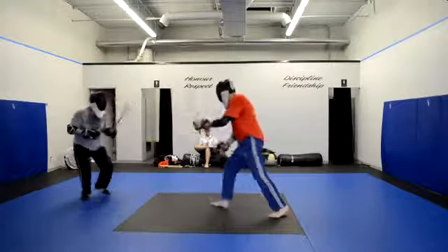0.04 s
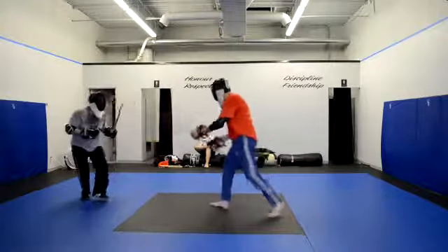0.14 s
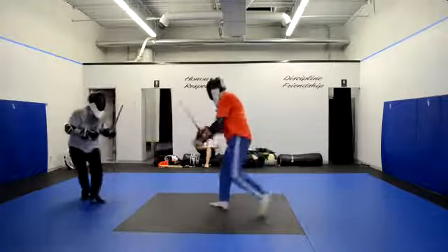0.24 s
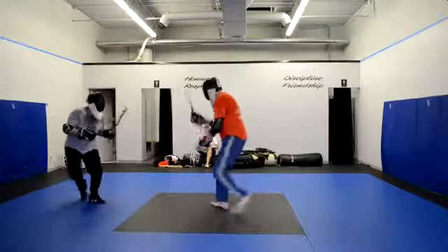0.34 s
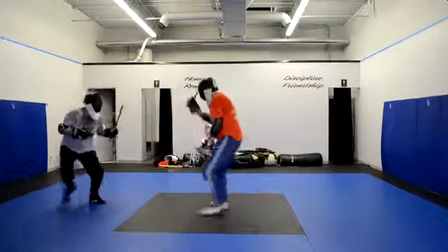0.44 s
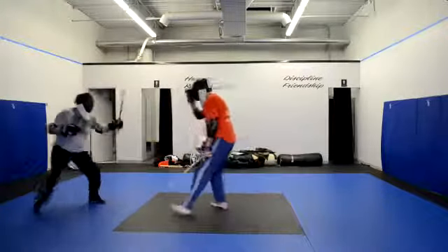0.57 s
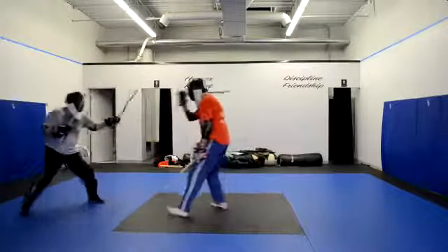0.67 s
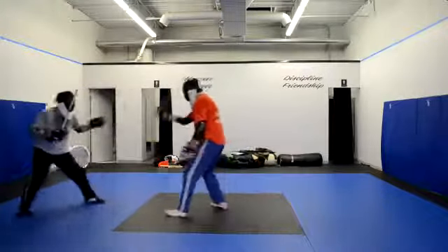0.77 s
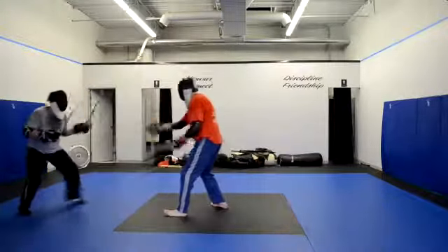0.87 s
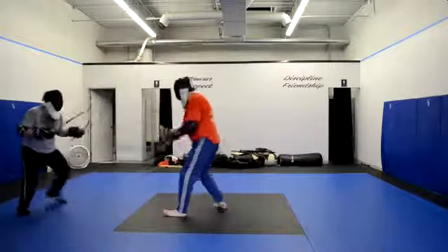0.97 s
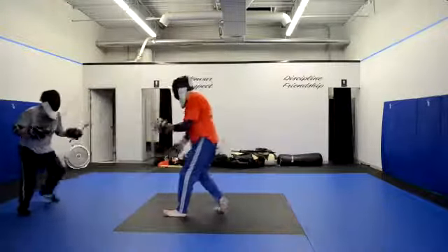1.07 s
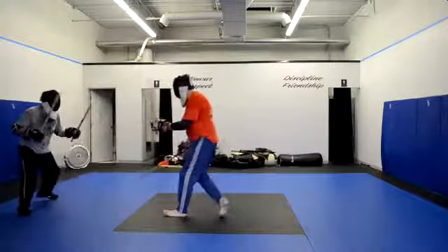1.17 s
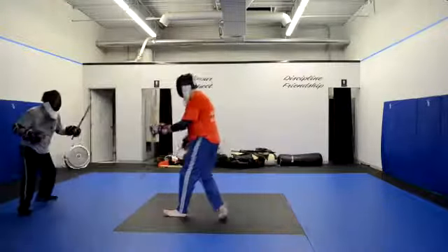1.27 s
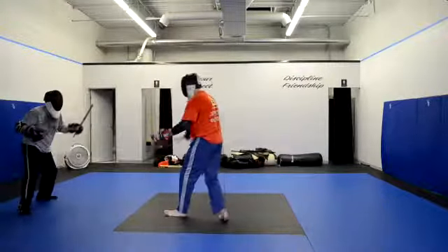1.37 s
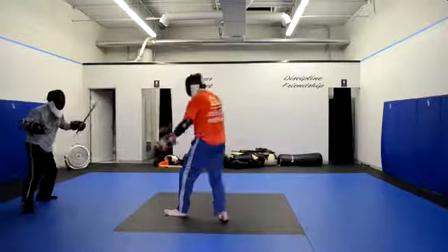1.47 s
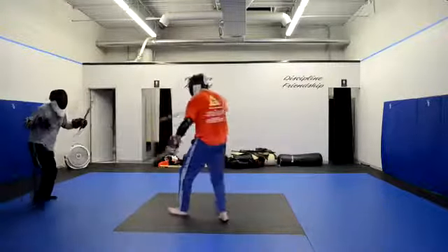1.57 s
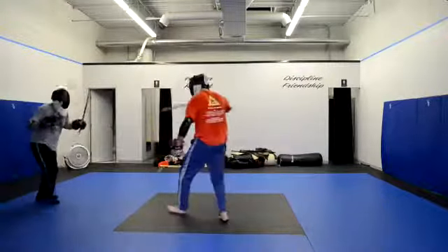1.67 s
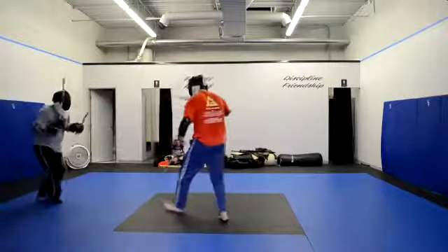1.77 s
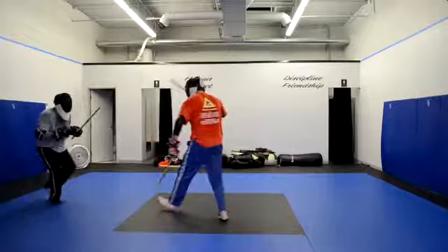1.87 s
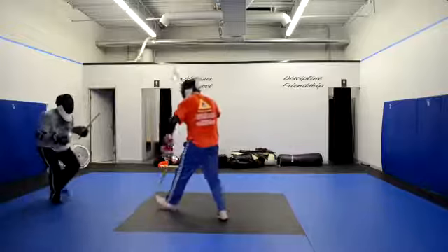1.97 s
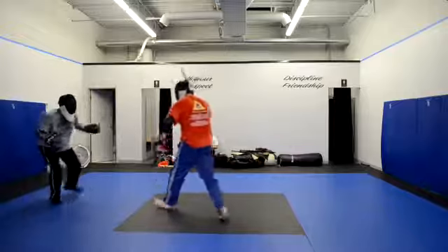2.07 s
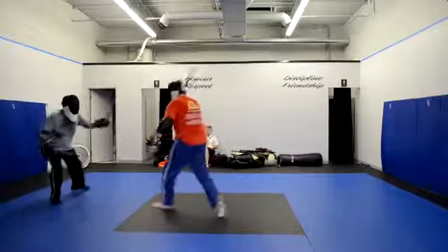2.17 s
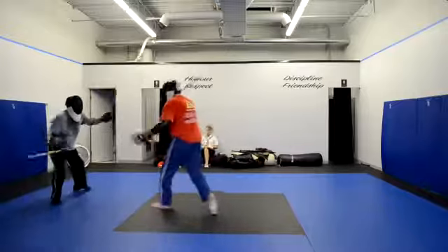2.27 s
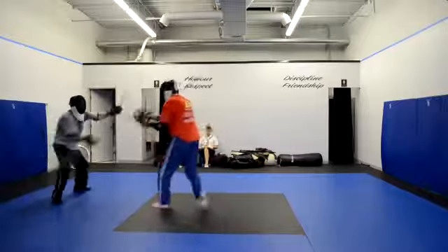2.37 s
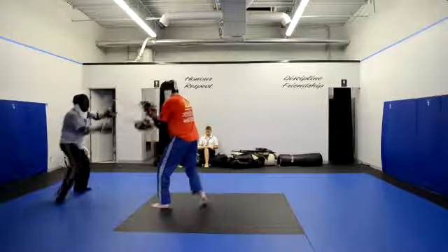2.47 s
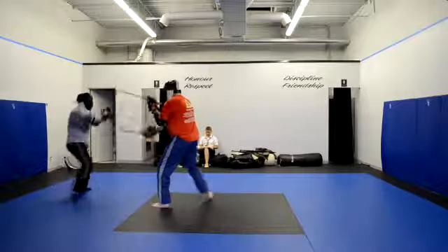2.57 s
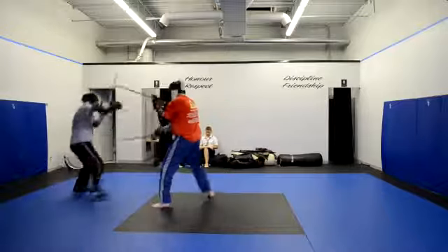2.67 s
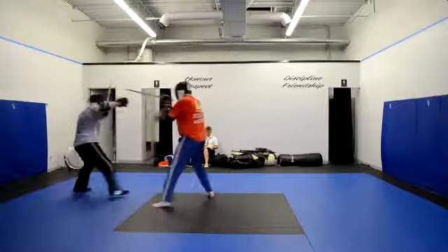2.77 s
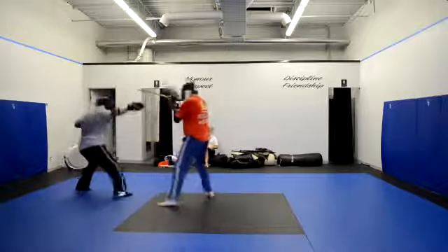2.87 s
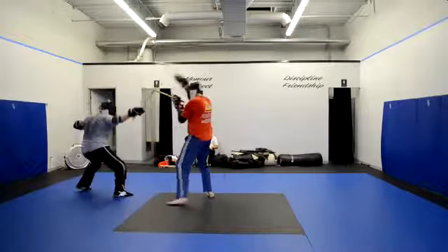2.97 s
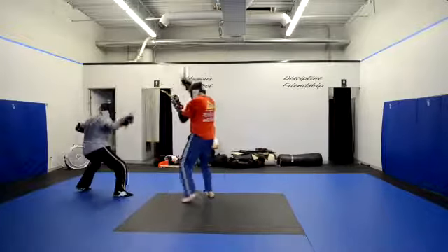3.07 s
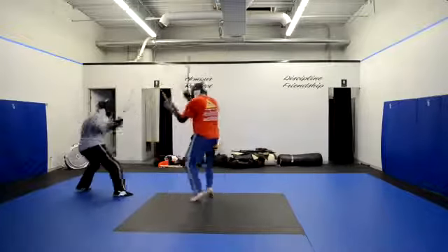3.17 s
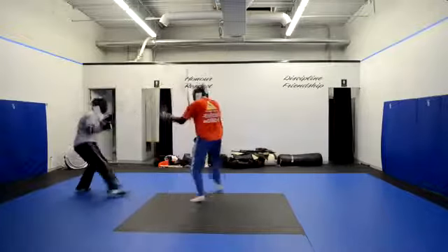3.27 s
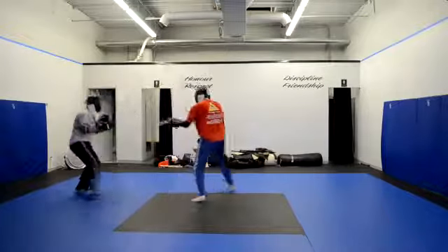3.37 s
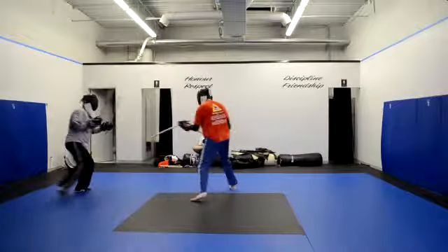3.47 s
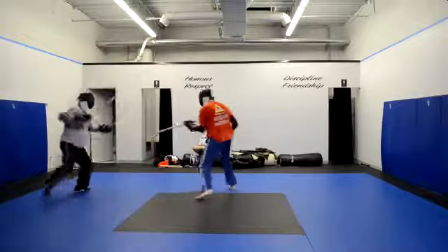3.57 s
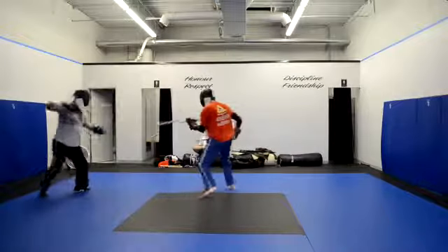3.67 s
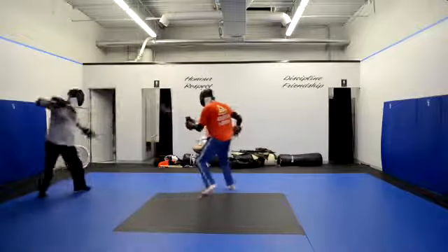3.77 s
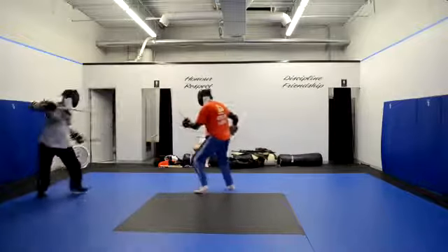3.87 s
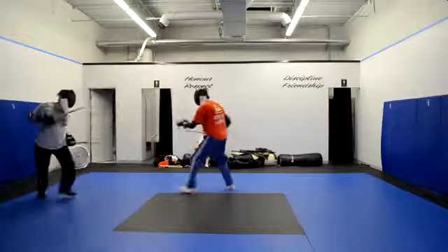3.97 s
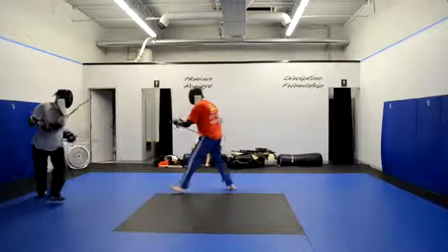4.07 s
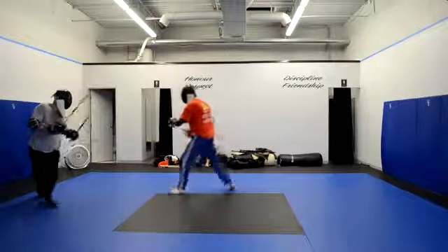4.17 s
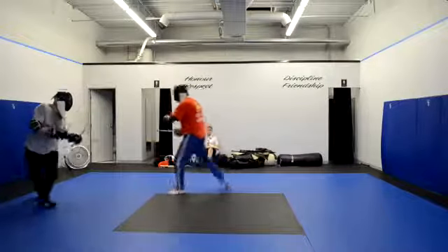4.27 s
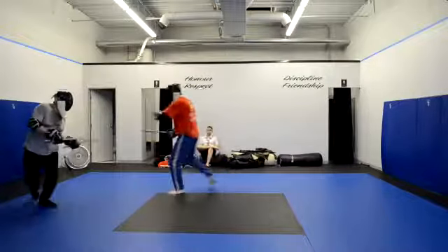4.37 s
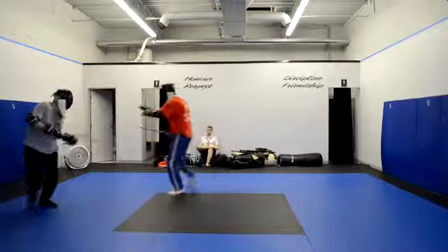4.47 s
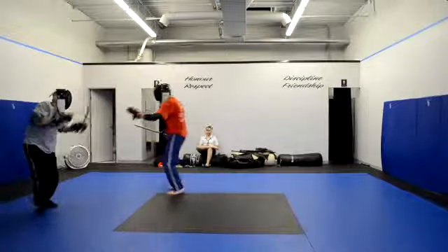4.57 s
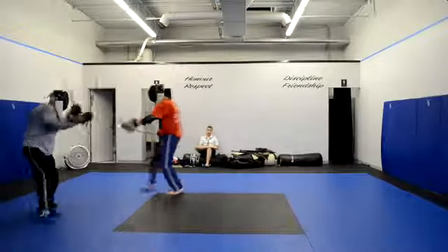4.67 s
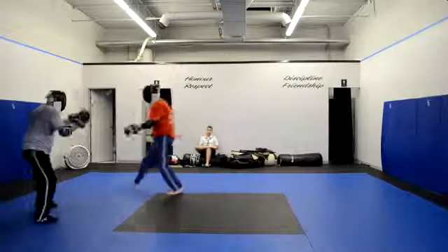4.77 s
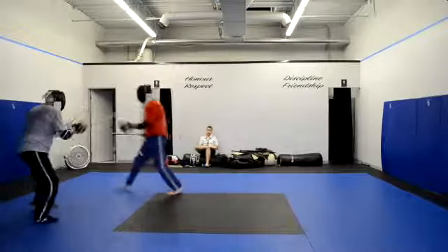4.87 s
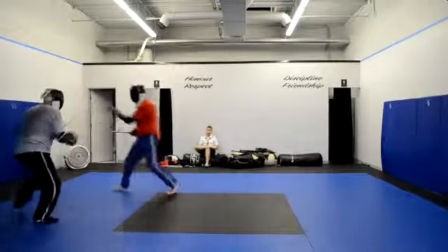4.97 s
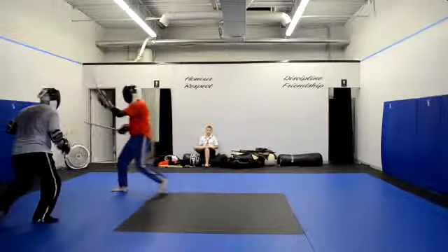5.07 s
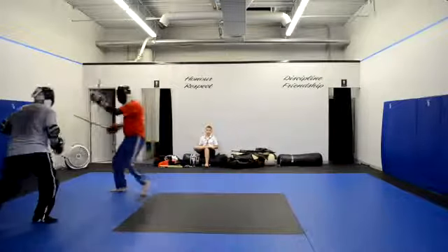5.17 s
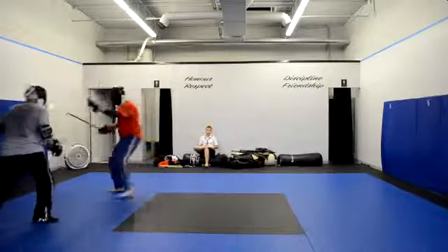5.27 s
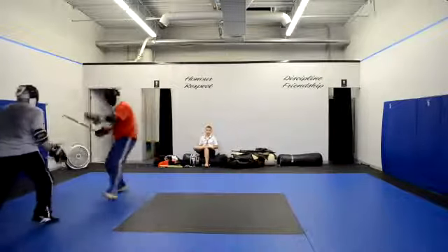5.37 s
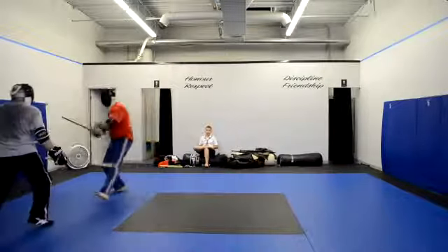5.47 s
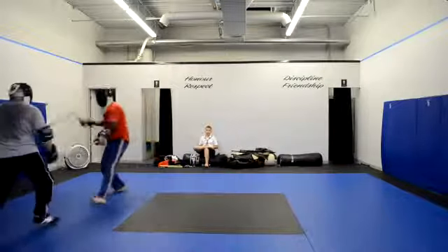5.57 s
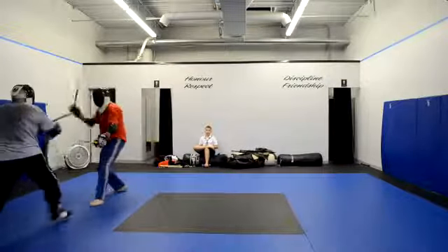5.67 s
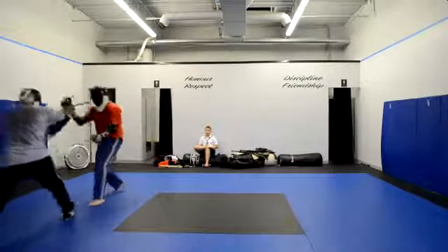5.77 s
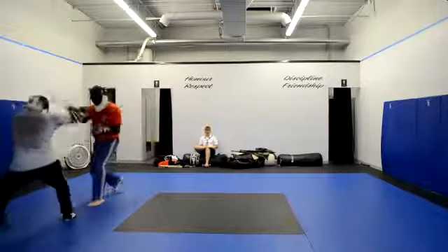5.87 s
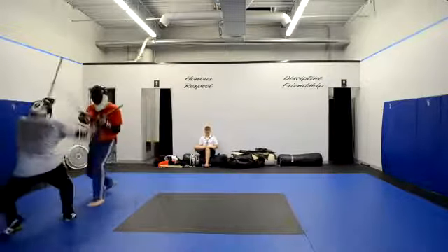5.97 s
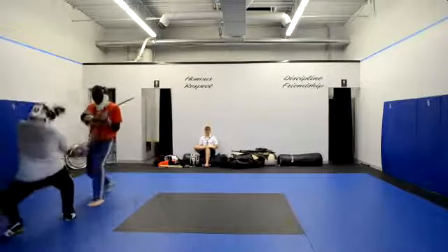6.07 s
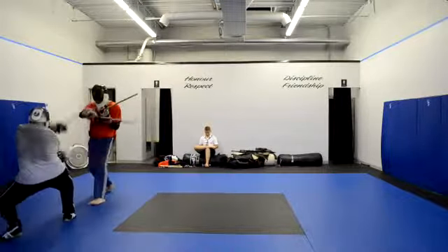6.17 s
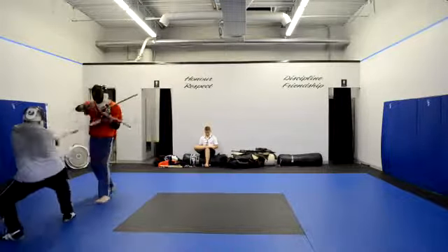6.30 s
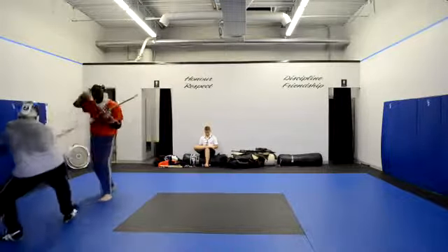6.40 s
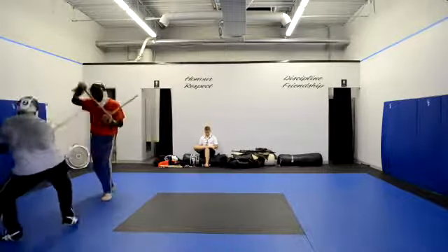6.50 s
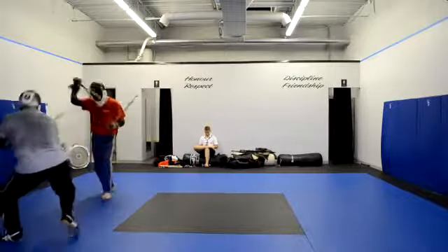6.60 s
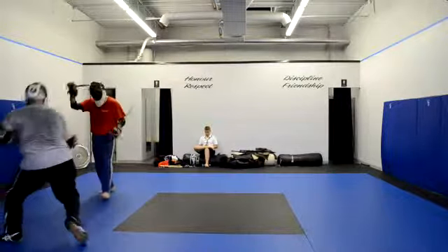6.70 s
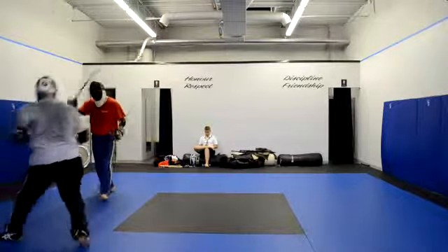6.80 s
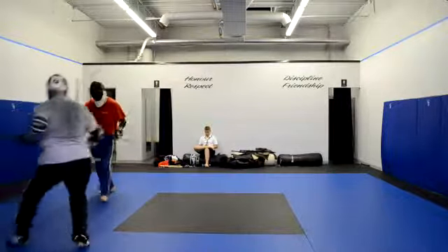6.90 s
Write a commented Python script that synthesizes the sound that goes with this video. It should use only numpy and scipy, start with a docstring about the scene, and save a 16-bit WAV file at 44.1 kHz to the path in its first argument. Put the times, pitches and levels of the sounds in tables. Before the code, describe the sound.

Over a quiet rush of ventilation, hard wooden sticks clack singly at irregular intervals: a light start, a cluster of three loud cracks near the middle, then four later hits, the last deeper and woodier. Every strike is dry and snappy with a brief rattle, then a diffuse hard-walled room tail. Muffled feet land on mats and gear rubs faintly. Mono room microphone, its echoes briefly squashed after the loudest cracks.

```python
"""Stick sparring in an echoing gym

Two people spar with wooden sticks on mats in a bare gym.
Each clack mixes a sharp crack, a short ring of stick modes, a bounce and a second of reverberation.
Feet thud as shaped clicks; gear, clothes and ventilation are filtered noise.
The hardest blows overload the recorder: it clips the first crack and ducks the echo.
"""
import sys
import numpy as np
from scipy import signal
from scipy.fft import rfft, irfft
from scipy.io import wavfile

SR = 44100
rng = np.random.default_rng(int(sys.argv[2]) if len(sys.argv) > 2 else 0)


def file_out(sig):
    """Save sig as 16-bit WAV at sys.argv[1]."""
    # one column per channel
    cols = np.atleast_2d(sig).T
    # limit, then scale
    lim = np.clip(cols, -1, 1)
    pcm = np.round(lim * 32767).astype(np.int16)
    wavfile.write(sys.argv[1], SR, pcm)


N = 306054  # length of the scene in samples
HZ = np.fft.rfftfreq(8192, 1 / SR)  # frequency axis of the short sounds

RING_DB = 9  # ring of a light blow against its crack
FIRM_DB, DAMPING_DB_PER_DB = -9.5, 1.76  # above FIRM_DB the grip damps the ring and the crack takes over
# a harder blow is a shorter contact, so its knock is higher
KNOCK_HZ, KNOCK_DB_PER_OCTAVE = 3480, 26.5  # KNOCK_HZ is the pitch at level 0 dB
# a square hit bites in the upper mids, most of all in the direct sound
BITE_HZ, EDGE_DB_PER_BITE_DB, EDGE_DB = 4240, 1.5, -1
DIRECT_DB = -5  # direct clack against its room sound
CHATTER_DB = -5  # chatter of the shafts against the bounce

# Blows, one a row: [t/s, room level/dB, contact spot/share of stick length, body/dB, crack/dB,
#   main tone f/Hz, main tone level/dB, bite/dB, bounce delay t/s, bounce level/dB]
BLOWS = [ (0.0585, -33.5, 0.13, 4, -4, 1720, 2.5, -5.5, 0.0082, -12),
         (0.3749, -16, .42, -7, -4, 2100, 1, 2, .0088, -2),
         (2.0107, -10.5, 0.052, -8, -4, 2320, 5, 7, 0.0078, 0.5),
         (2.4785, -5, .345, 7.5, 2.5, 1140, 4.5, 1, .0092, -1),
         (2.9518, -1.5, 0.17, -0.5, 3, 1980, 3.5, 6.5, .0020, -12),
         (4.4270, -18.5, 0.18, -3, -2.5, 800, 1.5, 4.5, .0138, -1),
         (4.7470, -3.5, 0.15, -3, -1, 1364, 2.5, 4.5, 0.01, -2.5),
         (5.1570, -12, 0.23, -6.5, -2, 2200, 0, -1.5, .006, -23),
         (5.9620, -6.5, 0.035, 15.5, -4, 685, 7, 4, .0074, -4)]
# Crack of wood on wood, spectrum shape: [f/Hz, relative level/dB]
CRACK_SPECTRUM = [(40, -36), (150, -21), (400, -8.5), (650, -3.5), (1000, 3), (1600, 8), (2400, 6.5),
                  (3500, -2), (5000, -11.5), (7000, -18), (9500, -26.5), (12000, -26.5)]


def sticks(body_hz=480, crack_hz=4500, tone_octaves=0.19, bite_octaves=0.38,
           edge_hz=3200, thin_hz=380, thin_db=-7, near_ring_db=6,
           knock_db=8, knock_octaves=0.19, spread_s=0.001532, spread_hz=1800,
           rebound_s=.0012, rattle_s=0.0026, rattle_db=-1):
    """Blows ring the sticks; where and how hard they meet sets the body, tones and brightness."""
    out = np.zeros(N)
    crack_power = amp(read(CRACK_SPECTRUM, HZ)) ** 2
    # bending waves carry treble faster than bass, which spreads each blow in time
    group_delay = spread_s / (1 + HZ / spread_hz)
    dispersion = np.exp(-2j * np.pi * np.cumsum(group_delay) * HZ[1])
    for s, db, spot, body_db, crack_db, tone_hz, tone_db, bite_db, bounce_s, bounce_db in BLOWS:
        ring_power = ringing(spot)
        ring_db = RING_DB - DAMPING_DB_PER_DB * max(db - FIRM_DB, 0)
        knock_hz = KNOCK_HZ * 2 ** (db / KNOCK_DB_PER_OCTAVE)
        edge_db = EDGE_DB + EDGE_DB_PER_BITE_DB * bite_db
        chatter_db = bounce_db + CHATTER_DB

        colour = body_db * (1 - above(body_hz))
        colour += crack_db * above(crack_hz)
        colour += tone_db * hump(tone_hz, tone_octaves)
        colour += bite_db * hump(BITE_HZ, bite_octaves)

        # the sound sent all round feeds the echo
        room_power = crack_power + amp(ring_db) ** 2 * ring_power
        room_clack = sized(impulse(colour + 10 * np.log10(room_power)), db)
        add(out, s, signal.fftconvolve(room_clack, gym()))

        # straight from the shaft the clack is thinner and more ringing, with a knock at one pitch
        direct_power = crack_power + amp(ring_db + near_ring_db) ** 2 * ring_power
        direct_spectrum_db = colour + 10 * np.log10(direct_power)
        direct_spectrum_db += edge_db * above(edge_hz)
        direct_spectrum_db += thin_db * (1 - above(thin_hz))
        direct_spectrum_db += knock_db * hump(knock_hz, knock_octaves)
        click = impulse(direct_spectrum_db)
        spread_click = irfft(rfft(click, 2 * len(HZ) - 2) * dispersion)
        clack = sized(spread_click, db + DIRECT_DB)

        contacts = [
            (0, 0),  # the shafts bite
            (rebound_s, chatter_db),
            (rattle_s, chatter_db + rattle_db),
            (bounce_s, bounce_db)]  # first strong bounce, off the floor or the near wall
        for after_s, gain_db in contacts:
            add(out, s + after_s, amp(gain_db) * clack)
    return out


LOWEST_MODE = 3  # order of the first mode in the table
NODE_SHARE = 0.3  # power left in a mode that is struck at one of its nodes

# Successive bending modes of the sticks: [f/Hz, width of the resonance/Hz, relative level/dB]
STICK_MODES = [(494, 45, -11), (839, 55, 3), (1245, 83, 5), (1765, 120, 3), (2228, 84, 3.5), (2833, 68, 2),
               (3446, 71, -4), (4116, 90, -12), (4784, 97, -13.5), (5466, 82, -17), (6300, 74, -21)]


def ringing(spot):
    """Power of the stick's ring over HZ: a mode sounds as strongly as it bends at the contact spot."""
    power = 0
    for order, (hz, width_hz, db) in enumerate(STICK_MODES, LOWEST_MODE):
        bend = np.cos((order + .5) * np.pi * spot + np.pi / 4)
        resonance = 1 / (1 + ((HZ - hz) / width_hz) ** 2) ** 2
        power = power + (NODE_SHARE + bend ** 2) * amp(db) ** 2 * resonance
    return power


# Feet landing on the mats: [t/s, heel level in the room/dB]
FOOTFALLS = [(0.767, -50), (2.906, -40.5), (4.245, -45.5), (4.303, -52), (5.876, -30), (6.801, -53)]
# Dull thud of a foot on a mat, spectrum shape: [f/Hz, relative level/dB]
THUD_SPECTRUM = [(30, -27.5), (80, -10), (150, 3.5), (220, -1.5), (370, 3.5), (490, -13.5), (660, -0.5),
                 (1100, -12.5), (2400, -11.5), (3800, -28), (7000, -32), (11000, -44.5)]


def feet(direct_db=-9, roll_s=.004, sole_db=3):
    """Dull thuds on the mats, heel then sole, heard mostly through the room."""
    out = np.zeros(N)
    for s, db in FOOTFALLS:
        thud = sized(impulse(read(THUD_SPECTRUM, HZ)), db)
        heel = in_gym(thud, direct_db)
        sole = amp(sole_db) * in_gym(thud, direct_db)
        add(out, s, heel)
        add(out, s + roll_s, sole)
    return out


# Small ticks and rubs of gloves and gear; room_db and direct_db in gear() are relative to the level:
#   [t/s, level/dB, centre f/Hz, length t/s (twice the rise to the peak)]
GEAR_RUBS = [(0.273, -59, 4840, .015), (0.713, -61, 6840, 0.014), (1.537, -61, 5300, 0.014),
             (1.592, -63, 6680, 0.018), (1.746, -62, 7250, 0.047), (4.063, -64, 5230, 0.028),
             (6.793, -62, 7400, 0.0083), (6.831, -57.5, 2670, .003)]


def gear(direct_db=1, sharpness=2.5, room_db=-4):
    """Brief bright rubs of gloves and gear: swelling and fading noise through a resonance."""
    out = np.zeros(N)
    t = np.arange(SR // 3) / SR
    for s, db, hz, length_s in GEAR_RUBS:
        swell = t * np.exp(-2 * t / length_s)
        rub = rng.standard_normal(len(t)) * swell
        rub = signal.lfilter(*signal.iirpeak(hz, sharpness, SR), rub)
        add(out, s, in_gym(sized(rub, db + room_db), direct_db - room_db))
    return out


STIR_DB = -75.5  # clothes between the moves

# Moves that rustle the clothes: [middle t/s, length t/s, level added to the stir at the middle/dB]
MOVE_RUSTLES = [(1.0, 0.19, -61.5), (1.653, 0.1, -61.5), (1.805, 0.18, -59.5), (3.718, 0.27, -62.5),
                (3.966, 0.37, -62.5), (6.44, 0.38, -57)]
# Rustling cloth, spectrum shape: [f/Hz, relative level/dB]
CLOTH_SPECTRUM = [(200, -24.5), (1500, 7.5), (4000, -3), (7000, -10.5), (12000, -11)]


def clothes():
    """Cloth rustles faintly all the time and swells and fades with each move."""
    t = np.arange(N) / SR
    level = amp(STIR_DB)
    for middle_s, length_s, db in MOVE_RUSTLES:
        level = level + amp(db) * np.exp(-(2 * (t - middle_s) / length_s) ** 2)
    return level * noise(lambda hz: amp(read(CLOTH_SPECTRUM, hz)))


AIR_DB = -50.5  # rms of the rush of air

# Rush of the ventilation, spectrum shape: [f/Hz, relative level/dB]
AIR_SPECTRUM = [(15, -30), (25, -36.5), (49, -15), (247, -5.5), (483, -6.5), (549, -6.5), (674, -8),
                (728, -8), (1040, -9), (1320, -9.5), (3240, -25), (4890, -36.5), (6170, -45), (7580, -42.5),
                (11700, -43), (15300, -82), (22000, -120)]
# Fan tones: [f/Hz, rms level/dB]
FAN_TONES = [(120, -66.5), (183, -61), (245, -62)]


def ventilation(waver_hz=8):
    """A steady rush of air with faint fan tones, each a narrow band of noise that wavers."""
    air = amp(AIR_DB) * noise(lambda hz: amp(read(AIR_SPECTRUM, hz)))
    for tone_hz, db in FAN_TONES:
        air += amp(db) * noise(lambda hz: 1 / (1 + ((hz - tone_hz) / waver_hz) ** 2))
    return air


# Reverberation of the bare gym: [f/Hz, time to fall by 60 dB t/s]
GYM_DECAY = [(100, 0.8), (300, 0.73), (700, 0.98), (1400, 0.92), (2500, 0.93), (4000, 1.012), (7000, 0.96),
             (11000, 0.68)]


def gym(first_s=0.0018, build_s=0.0023, scatter_db=-0.5, settle_s=0.04):
    """Echoes from one spot: uneven early reflections merge into a tail with its own decay per band."""
    t = np.arange(int(1.4 * SR)) / SR
    signs = rng.choice([-1., 1.], len(t))
    taps = signs * (rng.random(len(t)) < 5000 / SR)  # about 5000 reflections a second
    unevenness = np.minimum(rng.exponential(1, len(t)), 4) * np.exp(-t / settle_s)
    taps *= amp(scatter_db * unevenness)
    hz, when, bands = signal.stft(taps, SR, nperseg=256)
    decay = amp(-60 * when / read(GYM_DECAY, hz)[:, None])
    tail = signal.istft(bands * decay, SR)[1][:len(t)]
    tail *= 1 - np.exp(-np.maximum(t - first_s, 0) / build_s)
    return tail / np.linalg.norm(tail)


def in_gym(sound, direct_db):
    """A sound heard directly and through the room, direct_db being relative to the room."""
    path = gym()
    path[0] += amp(direct_db)
    return signal.fftconvolve(sound, path)


def amp(db):
    """Decibels to gain."""
    return 10 ** (np.asarray(db) / 20)


def read(points, hz):
    """A table joined by straight lines on a log-frequency axis."""
    f, value = np.transpose(points)
    return np.interp(np.log(hz + 1), np.log(f), value)


def add(mix, s, sound):
    """Mixes a sound in at time s."""
    part = mix[max(round(s * SR), 0):][:len(sound)]
    part += sound[:len(part)]


def sized(x, db):
    """Gives a short sound the energy of 10 ms at level db."""
    return amp(db) * x * np.sqrt(SR / 100 / np.sum(x ** 2))


def impulse(db):
    """The causal, minimum-phase click whose spectrum over HZ is db."""
    log_gain = np.log(amp(np.r_[db, db[-2:0:-1]]))
    spectrum = np.exp(np.conj(signal.hilbert(log_gain)))[:len(HZ)]
    return irfft(spectrum)[:len(HZ)]


def noise(gain):
    """Noise of rms 1 whose spectrum follows the function gain(Hz)."""
    spectrum = rfft(rng.standard_normal(N)) * gain(np.fft.rfftfreq(N, 1 / SR))
    x = irfft(spectrum, N)
    return x / x.std()


def above(hz):
    """A smooth step over HZ, from 0 well below hz to 1 well above it."""
    return 1 - 1 / (1 + (HZ / hz) ** 4)


def hump(hz, octaves):
    """A bell of height 1 over HZ."""
    return np.exp(-.5 * (np.log2((HZ + 1) / hz) / octaves) ** 2)


def low_pass(x, hz):
    """A steep band limit."""
    taps = signal.firwin(401, hz, window=("kaiser", 8), fs=SR)
    return signal.oaconvolve(x, taps[None], "same")


def smooth(x, seconds):
    """One-pole lag."""
    r = np.exp(-1 / (seconds * SR))
    return signal.lfilter([1 - r], [1, -r], x)


def scene():
    """Everything in the gym, at one microphone."""
    return (sticks() + feet() + gear() + clothes() + ventilation())[None]


def record(dry, limit_db=-9.0, recover_db_per_s=50, sense_s=0.0024, attack_s=0.00012, band_hz=11950):
    """A limiter ducks the echo of hard blows, whose first crack slips through and clips; then a band limit."""
    power_db = 10 * np.log10(smooth(dry[0] ** 2, sense_s) + 1e-12)
    # the sensed peak is held, then falls at a steady rate
    fall_db = np.arange(N) / SR * recover_db_per_s
    held_db = np.maximum.accumulate(power_db + fall_db) - fall_db
    over_db = np.maximum(held_db - limit_db, 0)
    ducked = dry * amp(-smooth(over_db, attack_s))
    # lopsided clipping adds a low thump to the hardest cracks
    clipped = np.clip(ducked, -.76, .92)
    return low_pass(clipped, band_hz)


dry = scene()
out = record(dry)
file_out(out)
```